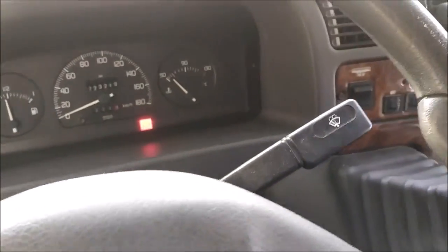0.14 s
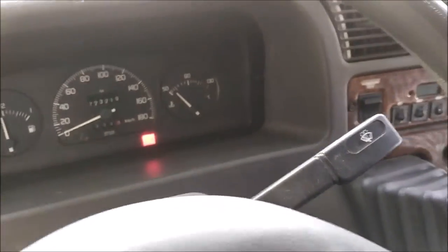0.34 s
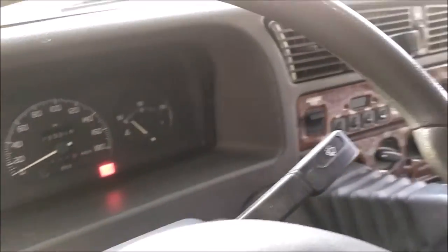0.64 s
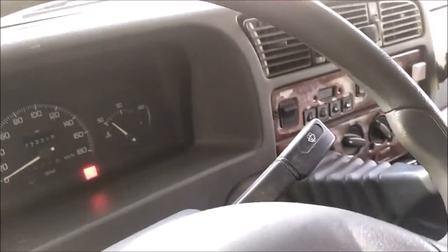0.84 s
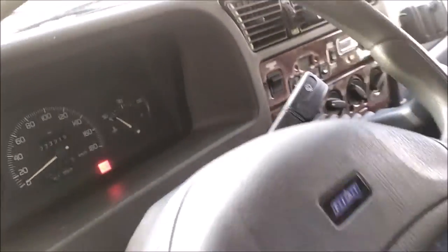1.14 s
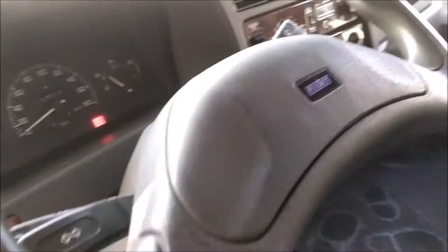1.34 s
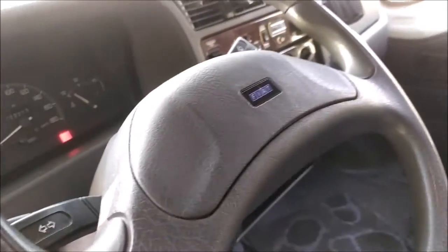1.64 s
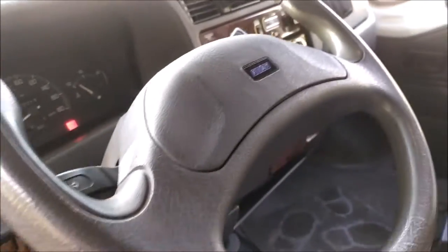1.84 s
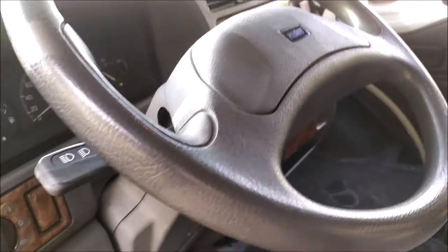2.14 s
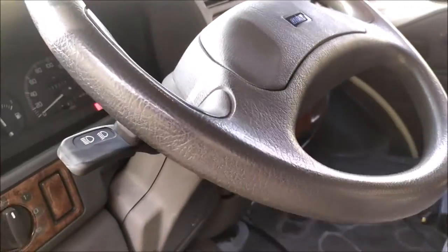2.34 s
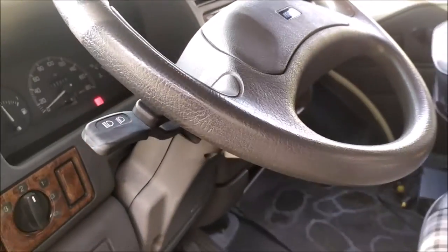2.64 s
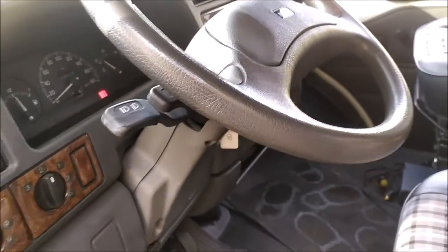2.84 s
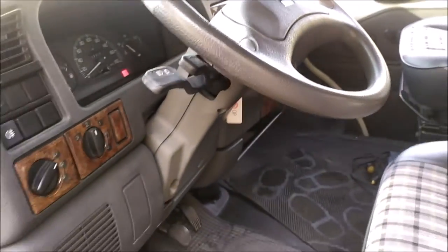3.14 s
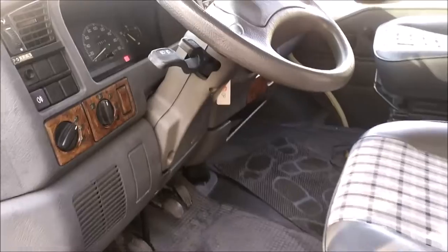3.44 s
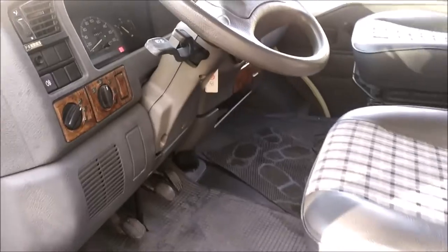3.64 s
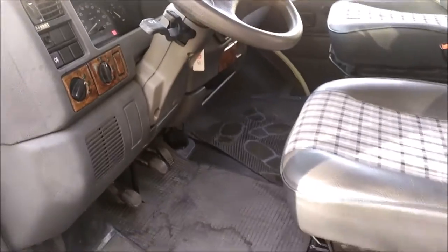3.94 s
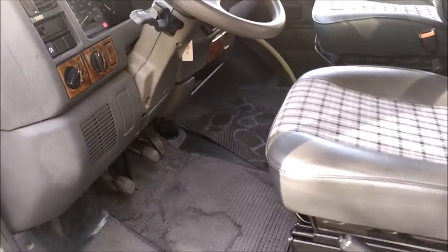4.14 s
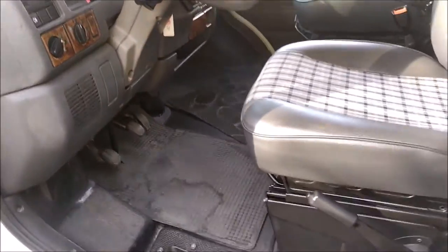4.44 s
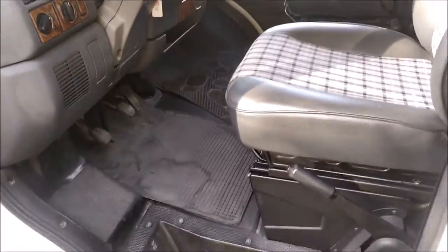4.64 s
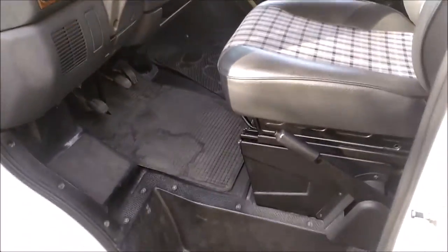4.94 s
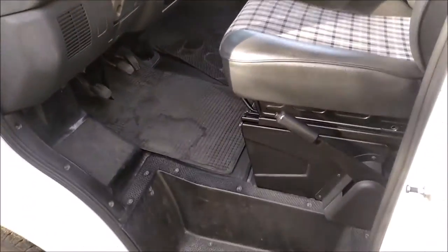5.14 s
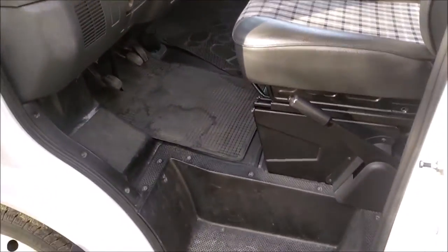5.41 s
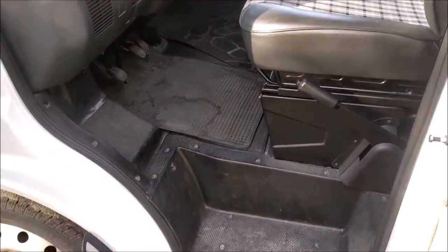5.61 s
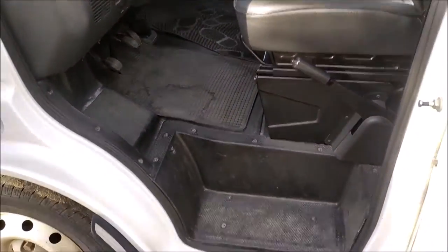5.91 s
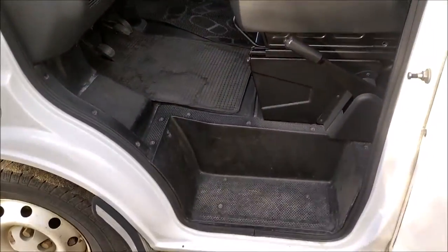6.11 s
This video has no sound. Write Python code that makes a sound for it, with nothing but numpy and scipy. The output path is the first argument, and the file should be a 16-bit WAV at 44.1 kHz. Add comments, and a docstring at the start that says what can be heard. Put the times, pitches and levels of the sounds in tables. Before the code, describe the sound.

A four-cylinder diesel van idles steadily for about six seconds, first heard from the driver's seat as a throbbing boom with muffled clatter. At 0.2 seconds a door latch springs open with a loud, ringing clack, and the cab rumbles low. Until about 1.7 seconds clothes slide softly over the seat, with small clicks and dull bumps near 0.3 and 1.3 seconds. At 1.9 seconds comes one hard knock on the door trim, then a brief sleeve swish. Between roughly 1 and 3.6 seconds the microphone moves out through the open door: the boom eases while the hard clatter grows, joined by a bright metallic rattle. From 3.6 to 5.8 seconds shoes crunch faintly on gravel several times, with small sharp clinks at 3.7 and 4.8 seconds. Near the end the idle takes on a slightly hollow ring beside the front wheel.

```python
"""In the cab of a van, a four-cylinder diesel idles while someone climbs out of the driver's seat.
Each firing booms through the body, rings the block and rattles the pistons and injectors.
A latch clacks, the cab is bumped and knocked, clothes slide over the seat, then shoes crunch on gravel.
We move out through the open door with them: the boom fades and the clatter grows."""
import sys
import numpy as np
from scipy import signal
from scipy.fft import rfft, irfft, next_fast_len
from scipy.io import wavfile
from scipy.ndimage import map_coordinates

SR = 44100
rng = np.random.default_rng(int(sys.argv[2]) if len(sys.argv) > 2 else 0)


def transcribe(u):
    """Save the signal u as a 16-bit wav file named by the first command-line argument.

    u: samples, shape (n,) or (channels, n), limited to [-1, 1]; the rate is SR.
    q: integer samples, one column per channel.
    """
    v = np.clip(np.atleast_2d(u).T, -1, 1)
    q = np.round(v * 32767).astype(np.int16)
    wavfile.write(sys.argv[1], SR, q)


N = 276507
TIME = np.arange(N) / SR
CYLINDER_COUNT, FIRING_HZ, FIRST_FIRING_S = 4, 22.423, 0.0375
LEAVE_S, STAND_OVER_S, CLIMB_OVER_S = 1.12, 0.76, 3.64  # setting off; time to clear the seat; to get out

# Stereo tilt of the engine and the cab knocks: frequency_hz, left_minus_right_db
CAB_TILT = [(60, 2.5), (150, 2), (380, 2.5), (950, -0.5), (2380, -1.5), (5980, 2.5), (15000, 2.0)]


def engine():
    """Four unequal cylinders knock and clatter in a repeating four-beat pattern over a running whirr."""
    # Accents, a row per cylinder in firing order:
    # thud_db, block_db, clatter_db, injector_db, floor_db, arch_db, slap_db
    accents = [(-0.5, -1, 9, 5, 6, -2.5, 9.5), (-2, -2.5, 6.5, 2, -1.5, -4, 8.5),
               (-0.5, 0, 11, 3, -4, 1.5, 7.5), (-0.5, 0.5, 11, 7.5, -2, 2, 13.5)]
    thud_db, block_db, clatter_db, injector_db, floor_db, arch_db, slap_db = np.transpose(accents)
    idle = body_thud(thud_db) + block_ring(block_db) + piston_slap(slap_db)
    idle += clatter(clatter_db) + injectors(injector_db) + whirr()
    idle += boom() + floor_throb(floor_db) + bulkhead() + wheel_arch(arch_db)
    return from_front(idle, CAB_TILT, lead_s=0.00024)


def body_thud(accents_db):
    """Each firing thuds through the body of the van."""
    # Low, padded tone: frequency_hz, level_db
    tone = [(85, -42), (115, 1.5), (145, 1.5), (180, -11.5), (230, -17), (313, -13), (360, -15), (480, -10),
            (700, -39)]
    stroke = impact_stroke(rise_s=0.0015, hold_s=0.04, t60_s=0.18, repeat_share=0.61)
    thuds = firings(stroke, accents_db, delay_s=0.001, scatter_db=0)
    return way_out(seat_db=-55.5, outside_db=-58) * coloured(thuds, tone)


def block_ring(accents_db):
    """Each cylinder rings its own modes of the block, in one balance at the seat and another outside."""
    # Block modes, a list per cylinder: pitch_hz, seat_db, outside_db, t60_s
    modes = [
        [(626, 7, 0.5, 0.054), (958, -16, -1, 0.088), (1540, -3.5, 0.5, 0.057), (1684, -6, -4.5, 0.12),
         (1958, 4, -2.5, .08)],
        [(675, -8, 0, .06), (780, -1, -8.5, 0.13), (1272, -2.5, -1.5, 0.06), (1375, -2, -5, 0.054),
         (1710, 0, 1, 0.059)],
        [(653, 10, -4, 0.034), (741.5, 8, 4, 0.078), (983, -5, -3, 0.077), (1347, 0, -1, .07),
         (1550, -13, -1.5, 0.076), (2070, -3, -5.5, 0.12)],
        [(640, 7, 0, 0.064), (1253, -5, -2, 0.046), (1430, -8, -2, 0.1), (1556, 0, 4, 0.078),
         (1708, 3, -3, 0.089)],
    ]

    def ring(level_column):
        strokes = [ring_stroke(np.array(rows)[:, [0, level_column, 3]], rise_s=0.003, vary=0.28)
                   for rows in modes]
        return firings(lambda cylinder: strokes[cylinder](cylinder), accents_db, delay_s=-0.001498)
    seat, outside = ring(level_column=1), ring(level_column=2)
    way = ramp(LEAVE_S, CLIMB_OVER_S)
    return amp(-59) * np.sqrt(1 - way) * seat + amp(-56) * np.sqrt(way) * outside


def piston_slap(accents_db, t60_s=0.055):
    """A piston strikes its bore, then again more softly, ringing the casing at that cylinder's spot."""
    # Hard midrange knock: frequency_hz, level_db
    tone = [(400, -30), (650, 5), (830, -7.5), (1050, 1), (1500, 0.5), (2300, -6.5), (3000, -9),
            (4500, -15.5), (6000, -19), (15000, -33)]
    t = np.arange(SR // 20) / SR
    casing = rng.standard_normal((CYLINDER_COUNT, 2, len(t))) * amp(-60 * t / t60_s)

    def stroke(cylinder):
        sound = np.zeros((2, 2 * len(t)))
        for start_s, level_db in bounces(start_s=0, level_db=0, gap_s=0.0095, loss_db=6, count=2):
            start = round(abs(rng.normal(start_s, 0.0003)) * SR)
            sound[:, start:start + len(t)] += amp(rng.normal(level_db, 0.5)) * casing[cylinder]
        return sound
    slaps = firings(stroke, accents_db, delay_s=-0.0005)
    return footwell_gain(screened_db=-63.5, open_db=-57.5) * coloured(slaps, tone)


def clatter(accents_db):
    """The diesel clatter: a burst of dense, hard impacts at every firing."""
    # Strong mids with a long treble slope: frequency_hz, level_db
    tone = [(300, -45), (440, -35), (560, -4), (680, -3), (830, -6), (1000, -6.5), (1500, -8), (2250, -12),
            (3000, -15), (4400, -22), (5400, -24), (9800, -24.5), (14400, -30.5), (15800, -49)]
    stroke = impact_stroke(rise_s=0.00057, hold_s=0.018, t60_s=0.084, repeat_share=0.36)
    bursts = firings(stroke, accents_db, delay_s=-0.0035, scatter_db=0)
    return way_out(seat_db=-61.5, outside_db=-56.5) * coloured(bursts, tone)


def injectors(accents_db):
    """The injectors' bright rattle, screened by the body until late on the way out."""
    # Metallic resonances: centre_hz, width_hz, level_db
    bands = [(2770, 120, -16), (3780, 950, -1.5), (4310, 190, 1), (4450, 150, 3), (8700, 1600, -13.5)]
    stroke = impact_stroke(rise_s=0.00068, hold_s=0.015, t60_s=0.14, repeat_share=0.79)
    bursts = firings(stroke, accents_db, delay_s=-0.004, scatter_db=1.5)
    return way_out(seat_db=-80, outside_db=-61.5, lateness=6.3) * resonant(bursts, bands)


def whirr():
    """Belts, fan and valve gear fill the gaps between firings with fluttering noise."""
    # Broad running noise: frequency_hz, level_db
    tone = [(59, -52), (100, -23), (173, -10.5), (243, -14.5), (355, -19), (467, -19.5), (640, -14.5),
            (825, -19), (1520, -16.5), (2320, -25), (8230, -32.5), (11800, -35.5), (15500, -59)]
    noise = coloured(stereo_noise(N), tone)
    flutter_db = 1.4 * wobble(rate_hz=12)
    return way_out(seat_db=-58.5, outside_db=-53.5) * noise * amp(flutter_db)


def boom(delay_s=0.0086):
    """Low engine orders crest just after each firing; unequal cylinders make the lowest one throb."""
    # Orders at 2, 3 and 4 times the firing rate: seat_db, outside_db
    orders = [(-49.5, -51.5), (-45, -53), (-69, -51.5)]
    phase = 2 * np.pi * FIRING_HZ * (TIME - idle_lag(TIME) - FIRST_FIRING_S - delay_s)
    depth_db = 6 - 2 * ramp(LEAVE_S, STAND_OVER_S)
    throb_db = depth_db * np.cos((phase - 2 * np.pi) / CYLINDER_COUNT)  # peaks on the second cylinder
    sound = np.zeros(N)
    for order, levels_db, throb_share in zip((2, 3, 4), orders, (1, 0.029, 0.029)):
        swell = amp(throb_share * throb_db + wobble(rate_hz=8.8))
        sound += way_out(*levels_db) * swell * np.cos(order * phase)
    return np.sqrt(2) * sound


def floor_throb(accents_db, pitch_hz=171.9, glide_hz_per_s=1830, length_s=0.065):
    """The floor pan answers the firings with short rising throbs, one strong beat per engine cycle."""
    t = np.arange(round(length_s * SR)) / SR
    swell = np.sin(np.pi * t / length_s) ** 2
    cycles = pitch_hz * t + glide_hz_per_s * t ** 2 / 2

    def stroke(cylinder):
        detune = rng.normal(1, 0.0314)
        return swell * np.sin(2 * np.pi * (cycles * detune + rng.random((2, 1))))
    throbs = firings(stroke, accents_db, delay_s=-0.02063, scatter_db=1.4)
    return footwell_gain(screened_db=-62, open_db=-57) * way_out(seat_db=-0.5, outside_db=-3.5) * throbs


def bulkhead():
    """The bulkhead hums after every firing, favouring no cylinder."""
    # Panel modes: pitch_hz, level_db, t60_s
    modes = [(268.6, -1.5, 0.12), (310.7, -2.5, 0.21)]
    stroke = ring_stroke(modes, rise_s=0.0098, vary=0.18)
    hum = firings(stroke, np.zeros(CYLINDER_COUNT), delay_s=0.0039, scatter_db=1.5)
    return way_out(seat_db=-63.5, outside_db=-62.5) * hum


def wheel_arch(accents_db):
    """The firings ring the hollow of the front wheel arch, heard once we are beside it."""
    # Cavity modes: pitch_hz, level_db, t60_s
    modes = [(688, -4, 0.093), (713, -9.5, 0.13)]
    hollow = firings(ring_stroke(modes, rise_s=0.002, vary=0.11), accents_db, delay_s=-0.00089)
    return amp(-55.5) * ramp(start_s=4.82, length_s=1) * hollow


def door_latch():
    """The latch springs open with a ringing clack and chatters twice."""
    # Ring of the latch: pitch_hz, level_db, t60_s
    modes = [(150, -9, 0.12), (262, -6, 0.15), (302, -14, .12), (387.6, -8.5, 0.19), (774, -6, 0.061),
             (860, -11, 0.076), (1860, 3, 0.06), (1940, -11, 0.082), (2300, -14, 0.075), (2790, -8, 0.076),
             (2966, -6, 0.068), (3580, -3, 0.065), (5570, -18, .058), (5835, -6, 0.047), (8280, -15, 0.086),
             (10750, -10, .06)]
    # Bright crack of the contact: frequency_hz, level_db
    tone = [(59, -48), (100, -7), (290, -5.5), (580, -6), (1040, -0.5), (1300, -8.5), (1700, -1),
            (2130, -9), (3610, -10.5), (4660, -13), (6000, -11), (7250, -17.5), (8410, -11), (9150, -22),
            (10400, -11), (15500, -30)]
    # Stereo tilt of the latch: frequency_hz, left_minus_right_db
    tilt = [(100, 7), (380, -1), (700, 4.5), (1290, -1.5), (4400, -3.5), (8120, 3.5), (15000, 10)]
    release, *repeats = bounces(start_s=0.1768, level_db=-17.5, gap_s=0.0045, loss_db=4.5, count=3)
    clack = blows([release], modes, tone,
                  ring_db=-4, crack_db=4.5, crack_t60_s=0.014, cab_db=-2, rise_s=0.00059)
    chatter = blows(repeats, [], tone,
                    ring_db=0, crack_db=1.5, crack_t60_s=0.013, cab_db=-3, rise_s=0.00022)
    return from_front(clack + chatter, tilt, lead_s=0.00041)


def trim_knock(flex_hz=423, flex_db=-15):
    """A hard knock on the door trim: the panel gives way, springs back and rings."""
    # The knock: start_s, level_db
    hits = [(1.9109, -19)]
    # Ring of the panel: pitch_hz, level_db, t60_s
    modes = [(75, -16, .2), (153, -10, 0.14), (301.5, -11, 0.29), (402, -5.5, 0.19), (468, -5.5, 0.23),
             (640, -28, .15), (832, -14, 0.11), (1364, -6, 0.12), (1980, -9, 0.083), (2340, -15, 0.11),
             (2450, -21, 0.084), (2820, -24, 0.11)]
    # Crack of the contact: frequency_hz, level_db
    tone = [(59, -36), (100, -14), (420, -2), (800, -11.5), (1620, -13.5), (1960, -11), (2270, -4.5),
            (2700, -17), (3460, -29.5), (4000, -25.5), (4700, -12), (5630, -27), (6660, -23), (9150, -22),
            (12600, -31), (15500, -50)]
    knock = blows(hits, modes, tone,
                  ring_db=-7, crack_db=-4.5, crack_t60_s=0.017, cab_db=-5, rise_s=0.00044)
    cycles = np.clip((TIME - hits[0][0]) * flex_hz, 0, 2)
    flex = -np.sin(2 * np.pi * cycles) * np.sin(np.pi * cycles / 2) ** 2
    return knock + amp(flex_db) * flex


def soft_bumps():
    """A shifting body bumps against the seat and floor."""
    # The bumps: start_s, level_db
    hits = [(.303, -40.5), (.412, -44), (.62, -50.5), (1.3365, -36.5), (1.948, -51)]
    # Low ring of seat and floor: pitch_hz, level_db, t60_s
    modes = [(146.4, 6, 0.15), (250, -6, 0.2), (387, -3, 0.088), (559, -3.5, 0.07)]
    # Dull puff of the contact: frequency_hz, level_db
    tone = [(60, 0), (150, 8), (450, -17), (1000, -21), (3000, -19), (10000, -43), (16000, -44)]
    return blows(hits, modes, tone, ring_db=1, crack_db=-24, crack_t60_s=0.036, cab_db=2, rise_s=0.0014)


def seat_frame():
    """The seat frame gives small knocks as the weight shifts."""
    # The knocks: start_s, level_db
    hits = [(.3035, -43.5), (.433, -49), (1.3345, -39), (1.355, -43), (1.948, -40)]
    # Ring of the frame: pitch_hz, level_db, t60_s
    modes = [(283, -5.5, 0.13), (408, -6, 0.063), (603, -10, 0.049), (780, -19, .06)]
    # Boxy clunk of the contact: frequency_hz, level_db
    tone = [(100, -15), (400, 6), (800, -10), (1200, -8), (15000, -56)]
    return blows(hits, modes, tone,
                 ring_db=-4, crack_db=10.5, crack_t60_s=0.033, cab_db=-8, rise_s=0.0011)


def clinks():
    """Metal and stone clink sharply on the way out."""
    # The clinks: start_s, level_db
    hits = [(3.7012, -40.5), (3.7205, -43), (4.7788, -38)]
    # High, short ring: pitch_hz, level_db, t60_s
    modes = [(3680, -5, .045), (4230, 2, .03), (5600, -6, .02), (7601, -3, .025), (8800, -5, .03)]
    # Sharp crack of the contact: frequency_hz, level_db
    tone = [(400, -22), (1000, 8), (4300, 1), (6200, -7), (8800, -3.5), (12000, -11), (15500, -22)]
    return blows(hits, modes, tone,
                 ring_db=-11, crack_db=1, crack_t60_s=0.02, cab_db=-16, rise_s=0.00034)


def ticks(trim_db=-1.5, t60_s=0.051):
    """Fittings and grit make tiny hard contacts, bright and brief."""
    # The clicks: start_s, level_db
    hits = [(0.304, -43), (0.3647, -36), (0.787, -46), (1.411, -46.5), (2.844, -51.5), (5.268, -50),
            (5.7766, -48)]
    # Thin, bright snap: frequency_hz, level_db
    tone = [(800, -4), (2500, -1), (5000, -1.5), (9000, 5), (12000, -1.5), (16000, -3)]
    t, track = np.arange(SR // 10) / SR, np.zeros((2, N))
    for start_s, level_db in hits:
        snap = coloured(rng.standard_normal((2, len(t))), tone) * amp(-60 * t / t60_s)
        add(track, start_s, amp(level_db + trim_db) * snap)
    return panned(left_db=2.5) * track


def clothes_slide():
    """Clothes rub over the seat in soft, even strokes."""
    # The slides: start_s, end_s, level_db
    strokes = [(.1, .17, -55), (.28, .6, -57), (.62, .96, -53), (.98, 1.2, -58), (1.22, 1.44, -48.5),
               (1.59, 1.67, -56)]
    # Cloth on upholstery: frequency_hz, level_db
    tone = [(530, -1.5), (900, -3.5), (1230, -13), (1300, -9), (1930, -8), (3580, -11.5), (4130, -10),
            (9180, -11), (15500, -23.5)]
    return friction(strokes, tone, fade_s=0.087, slips_per_s=1500, slip_db=3, hiss=1.3, clump_db=-0.1)


def sleeve_swish():
    """A sleeve brushes past in quick, fine-grained swishes."""
    # The swishes: start_s, end_s, level_db
    strokes = [(2.039, 2.093, -49), (2.15, 2.19, -60.5), (2.68, 2.73, -61)]
    # Airy fabric hiss: frequency_hz, level_db
    tone = [(1470, -35), (2500, -5), (2810, -13), (2960, -10), (3460, -8), (4820, -3.5), (10700, -5),
            (15800, -12)]
    swish = friction(strokes, tone, fade_s=0.0049, slips_per_s=3900, slip_db=1, hiss=1, clump_db=1)
    return panned(left_db=1.5) * swish


def gravel_steps():
    """Shoes press into gravel and the stones slip in uneven clumps."""
    # The presses: start_s, end_s, level_db
    strokes = [(3.64, 3.83, -56.5), (3.7, 3.76, -57), (3.775, 3.825, -63), (4.31, 4.47, -59),
               (4.66, 4.84, -58.5), (4.93, 4.99, -53), (5.22, 5.45, -60.5), (5.68, 5.8, -65)]
    # Crisp crunch: frequency_hz, level_db
    tone = [(1000, -8), (3000, 3.5), (6000, -2), (10000, 0), (13000, -6), (16000, -14)]
    return friction(strokes, tone, fade_s=0.031, slips_per_s=300, slip_db=2.3, hiss=1, clump_db=4)


def cab_rocking(rise_s=0.13, fade_db_per_s=6, rest_db=-61.5):
    """A deep rumble of the cab and seat springs swells with each shift of weight and dies away."""
    # Shifts of weight: crest_s, level_db
    shifts = [(.15, -45.5), (1.3, -51), (1.9, -55)]
    # Deep rumble: frequency_hz, level_db
    tone = [(20, -40), (30, -22), (40, 2.5), (60, -4), (100, -6), (150, -15), (260, -22), (600, -100)]
    power = amp(rest_db) ** 2
    for crest_s, level_db in shifts:
        fade_db = fade_db_per_s * np.maximum(TIME - crest_s, 0)
        power += (ramp(crest_s - rise_s, rise_s) * amp(level_db - fade_db)) ** 2
    return np.sqrt(power) * coloured(stereo_noise(N), tone)


def firings(stroke, accents_db, delay_s, scatter_db=1.0):
    """One stroke per firing, each cylinder at its own strength; stereo, at rms 1."""
    track = np.zeros((2, N))
    for firing in range(-1, int(N / SR * FIRING_HZ) + 1):
        cylinder = firing % CYLINDER_COUNT
        due_s = FIRST_FIRING_S + firing / FIRING_HZ
        strength = amp(rng.normal(accents_db[cylinder], scatter_db))
        add(track, due_s + idle_lag(due_s) + delay_s, strength * stroke(cylinder))
    return unit(spread(track))


def idle_lag(time_s):
    """The idle speed wanders, so the firings come a little late or early."""
    # Drift off the beat: time_s, lag_s
    drift = [(0, -0.0015), (1.6, 0.003), (2.8, 0.00046), (3.6, -0.002), (4.75, -.003), (5.5, 0.0019)]
    return np.interp(time_s, *np.transpose(drift))


def impact_stroke(rise_s, hold_s, t60_s, repeat_share):
    """A noise burst of dense impacts; a share repeats as each cylinder's own signature."""
    t = np.arange(SR // 14) / SR
    envelope = np.minimum(t / rise_s, 1) * amp(-60 * np.maximum(t - hold_s, 0) / t60_s)
    signature = np.sqrt(repeat_share) * rng.standard_normal((CYLINDER_COUNT, 2, len(t)))

    def stroke(cylinder):
        fresh = np.sqrt(1 - repeat_share) * rng.standard_normal((2, len(t)))
        return envelope * (signature[cylinder] + fresh)
    return stroke


def ring_stroke(modes, rise_s, vary):
    """A stroke of dying modes; each cylinder strikes them in its own way, nearly alike every cycle."""
    t = np.arange(SR // 8) / SR
    waves = np.array([amp(db - 60 * t / t60_s) * np.exp(2j * np.pi * hz * t) for hz, db, t60_s in modes])
    waves *= 1 - np.exp(-t / rise_s)
    signature = np.exp(2j * np.pi * rng.random((CYLINDER_COUNT, 2, len(modes))))

    def stroke(cylinder):
        change = rng.standard_normal((2, len(modes))) + 1j * rng.standard_normal((2, len(modes)))
        weights = signature[cylinder] * (1 + vary * change)
        return (weights @ waves).real
    return stroke


def blows(hits, modes, tone, ring_db, crack_db, crack_t60_s, cab_db, rise_s):
    """Each blow cracks, rings the struck part and dies away in the cab."""
    t, track = np.arange(SR // 3) / SR, np.zeros((2, N))
    attack = 1 - np.exp(-t / rise_s)
    for start_s, level_db in hits:
        ring = np.zeros((2, len(t)))
        for hz, mode_db, t60_s in modes:
            decay = amp(rng.normal(mode_db, 1, (2, 1)) - 60 * t / t60_s)
            phase = rng.normal(0, min(hz / 4000, 0.8), (2, 1))  # higher modes sound wider
            ring += decay * np.sin(2 * np.pi * hz * t + phase)
        crack = coloured(rng.standard_normal(len(t)), tone) * amp(-60 * t / crack_t60_s)
        blow = amp(ring_db) * ring + amp(crack_db) * crack + amp(cab_db) * cab_tail(tone, len(t))
        add(track, start_s, amp(level_db) * attack * blow)
    return track


def cab_tail(tone, samples):
    """The cab's short reverb: a wash of noise whose treble dies first."""
    # Decay of the cab: frequency_hz, t60_s
    decay_times = [(150, 0.22), (400, 0.14), (1000, 0.12), (3000, 0.081), (12000, 0.063)]
    hz, age_s, wash = signal.stft(coloured(stereo_noise(samples), tone), SR, nperseg=256)
    decay = amp(-60 * age_s / along(decay_times, hz)[:, None])
    return signal.istft(wash * decay, SR)[1][:, :samples]


def bounces(start_s, level_db, gap_s, loss_db, count):
    """A contact and its ever softer repeats, as rows of start_s, level_db."""
    return [(start_s + k * gap_s, level_db - k * loss_db) for k in range(count)]


def friction(strokes, tone, fade_s, slips_per_s, slip_db, hiss, clump_db, grain_s=0.00068):
    """Swelling strokes of little slips, in uneven clumps, over a fine hiss."""
    pressure = np.zeros(N)
    for start_s, end_s, level_db in strokes:
        inside_s = np.minimum(TIME - start_s, end_s - TIME)
        pressure += amp(level_db) * np.clip(inside_s / (2 * fade_s) + 0.5, 0, 1)
    slips = rng.random(N) < slips_per_s / SR
    sizes = amp(slip_db * np.minimum(rng.exponential(size=N), 4))
    decays = signal.lfilter([1], [1, -np.exp(-1 / (grain_s * SR))], slips * sizes)
    grains = unit(decays * rng.standard_normal((2, N)))
    texture = grains + hiss * rng.standard_normal((2, N))
    clumps = amp(clump_db * wobble(rate_hz=60))
    return pressure * coloured(texture * clumps, tone)


def way_out(seat_db, outside_db, lateness=1):
    """Gain that crossfades from the seat to outside; lateness above 1 holds the change back."""
    share = ramp(LEAVE_S, CLIMB_OVER_S) ** lateness
    return np.sqrt((1 - share) * amp(seat_db) ** 2 + share * amp(outside_db) ** 2)


def footwell_gain(screened_db, open_db):
    """Sound from the footwell opens up quickly as we clear the steering wheel."""
    return amp(screened_db + (open_db - screened_db) * ramp(start_s=1.98, length_s=0.4))


def from_front(sound, tilt, lead_s):
    """Sound from the front of the van reaches the left side first, with a tilt between the sides."""
    def response(hz):
        left = amp(along(tilt, hz) / 2) * np.exp(1j * np.pi * hz * lead_s)
        return np.array([left, 1 / left])
    return filtered(sound, response)


def spread(pair):
    """Two unrelated signals become a stereo field, near mono in the bass."""
    # Likeness of left and right: frequency_hz, correlation
    likeness = [(60, 1), (150, 0.89), (380, 1), (950, 0.9), (2380, -0.043), (5980, 0.16), (15000, -0.47)]

    def mid_side(hz):
        angle = np.arccos(np.clip(along(likeness, hz), -1, 1)) / 2
        return np.array([np.cos(angle), np.sin(angle)])
    mid, side = filtered(pair, mid_side)
    return np.array([mid + side, mid - side])


def stereo_noise(samples):
    """White noise, narrow in the bass and wide in the treble."""
    return spread(rng.standard_normal((2, samples)))


def panned(left_db):
    """Channel gains that put the left side left_db above the right."""
    return amp(np.array([[left_db], [-left_db]]) / 2)


def coloured(sound, tone):
    """The sound through an EQ curve, at rms 1."""
    return unit(filtered(sound, lambda hz: amp(along(tone, hz))))


def resonant(sound, bands):
    """The sound through parallel resonances of alternating polarity, at rms 1."""
    def response(hz):
        return sum((-1) ** k * amp(db) * 1j * hz * width / (centre ** 2 - hz ** 2 + 1j * hz * width)
                   for k, (centre, width, db) in enumerate(bands))
    return unit(filtered(sound, response))


def filtered(sound, response):
    """The sound with its spectrum multiplied by response(hz)."""
    size = sound.shape[-1]
    padded = next_fast_len(size + SR // 4)
    hz = np.fft.rfftfreq(padded, 1 / SR)
    return irfft(rfft(sound, padded) * response(hz), padded)[..., :size]


def along(curve, hz):
    """Read a curve on a log frequency axis."""
    points_hz, values = np.transpose(curve)
    return np.interp(np.log(hz + 1), np.log(points_hz + 1), values)


def wobble(rate_hz):
    """A smooth random curve through rate_hz points a second."""
    return map_coordinates(rng.standard_normal(int(N * rate_hz / SR) + 4), [TIME * rate_hz])


def ramp(start_s, length_s):
    """A steady rise from 0 to 1."""
    return np.clip((TIME - start_s) / length_s, 0, 1)


def add(track, start_s, sound):
    """Mix a sound into the track."""
    start = round(start_s * SR)
    lo, hi = max(start, 0), min(start + sound.shape[-1], N)
    if hi > lo:
        track[:, lo:hi] += sound[:, lo - start:hi - start]


def amp(db):
    """Decibels to gain."""
    return 10 ** (np.asarray(db) / 20)


def unit(sound):
    """Scale to rms 1."""
    return sound / np.sqrt(np.mean(sound ** 2) + 1e-20)


def scene():
    """The idling van, and the person getting out of it."""
    rustle_and_steps = clothes_slide() + sleeve_swish() + gravel_steps()
    van = engine() + cab_rocking()
    latch = door_latch()
    knocks = from_front(trim_knock() + soft_bumps() + seat_frame(), CAB_TILT, lead_s=0.00032)
    return van + latch + knocks + clinks() + ticks() + rustle_and_steps


def record(dry):
    """The microphone rolls off the deepest bass and cuts the very top."""
    low_cut_hz, top_hz = 33.0, 15800
    return filtered(dry, lambda hz: (hz < top_hz) * hz ** 4 / np.sqrt(hz ** 8 + low_cut_hz ** 8))


dry = scene()
out = record(dry)
transcribe(out)
```